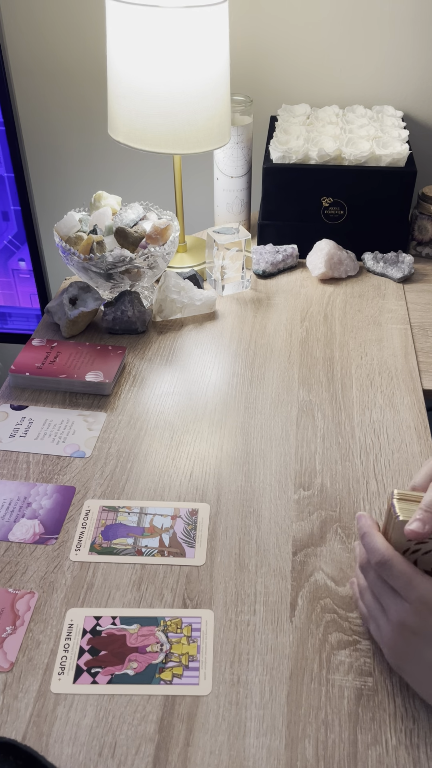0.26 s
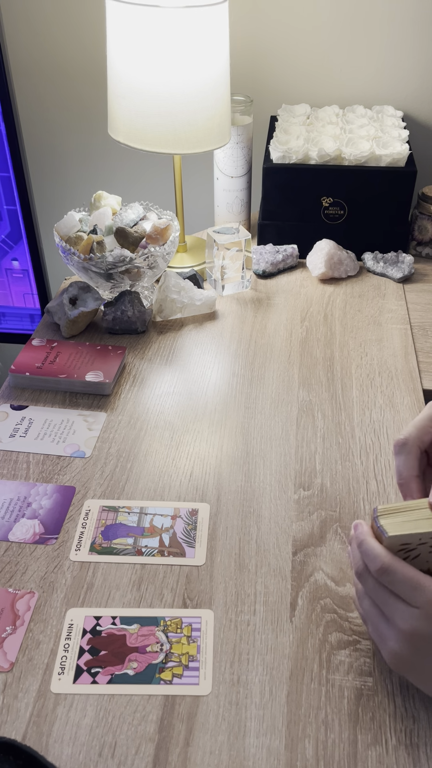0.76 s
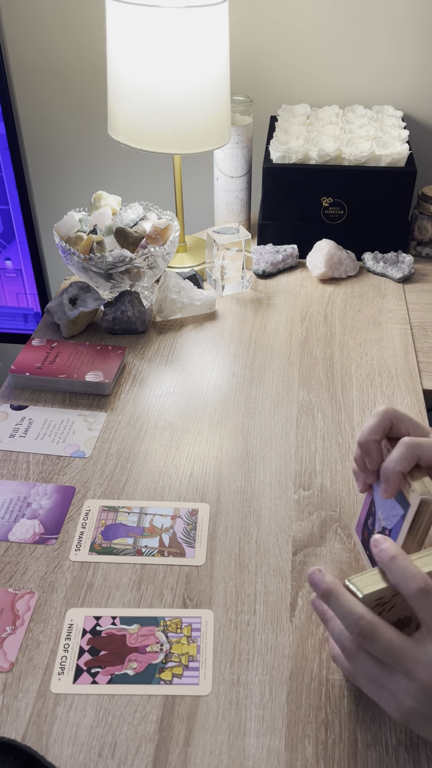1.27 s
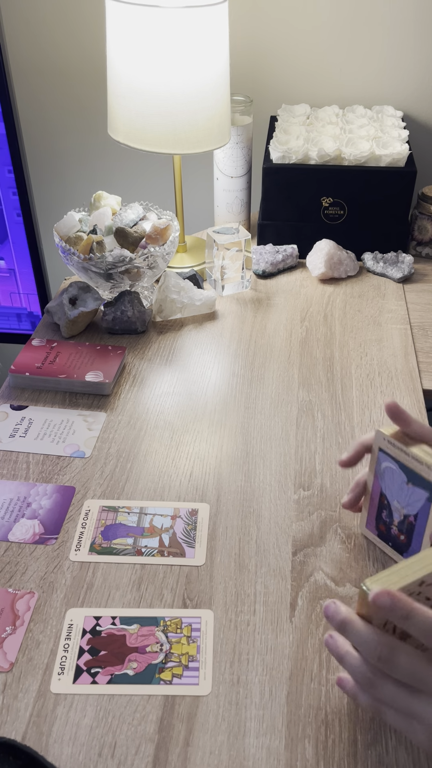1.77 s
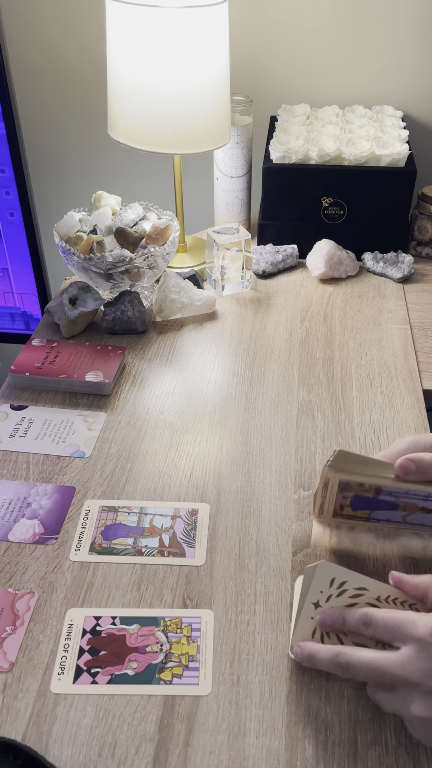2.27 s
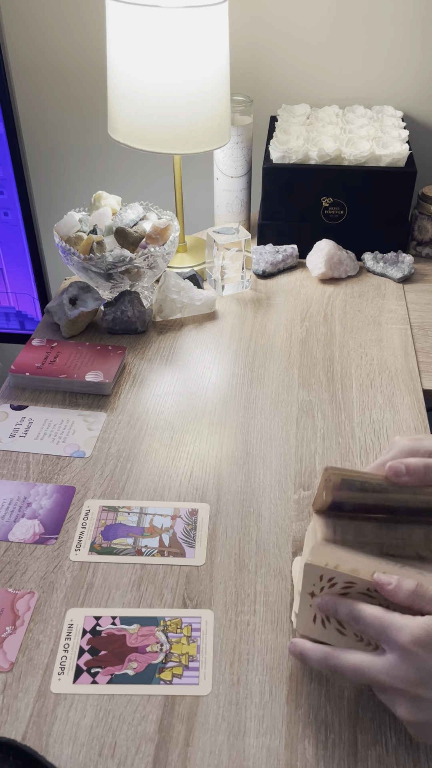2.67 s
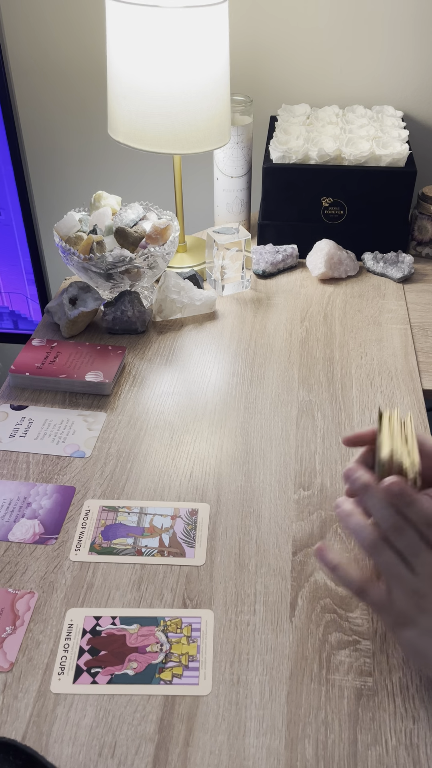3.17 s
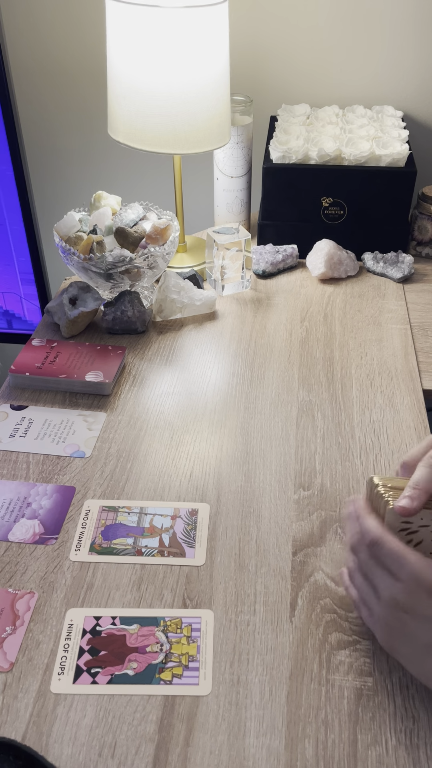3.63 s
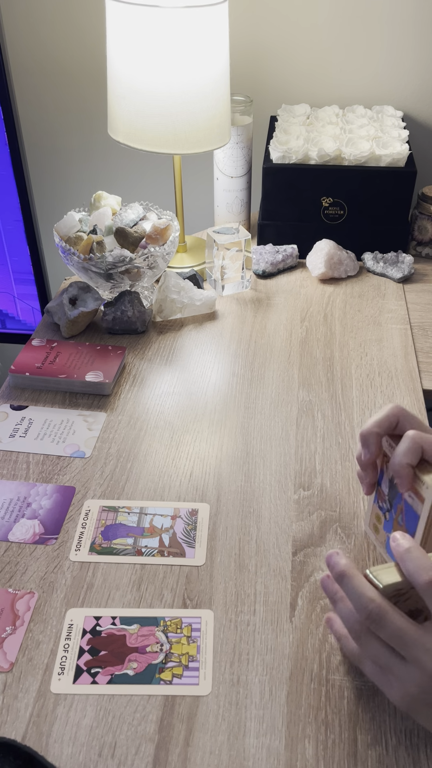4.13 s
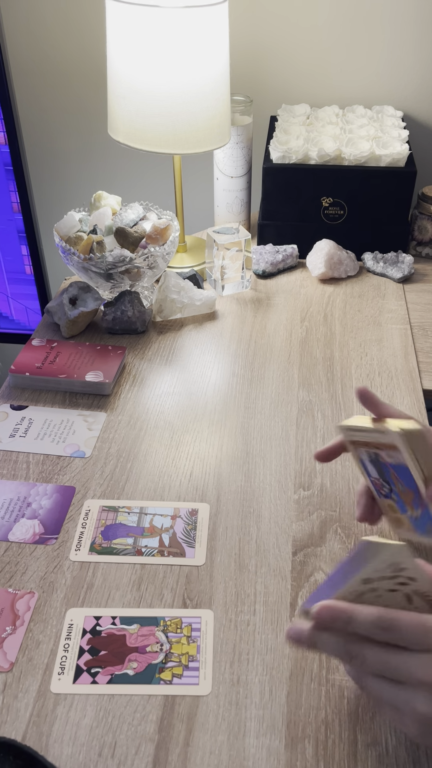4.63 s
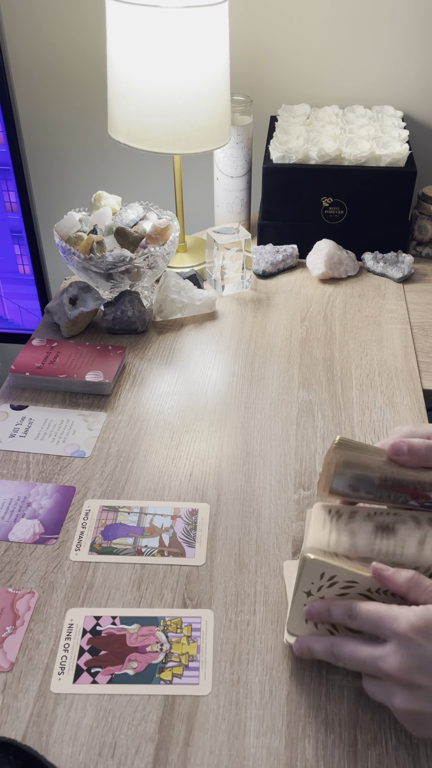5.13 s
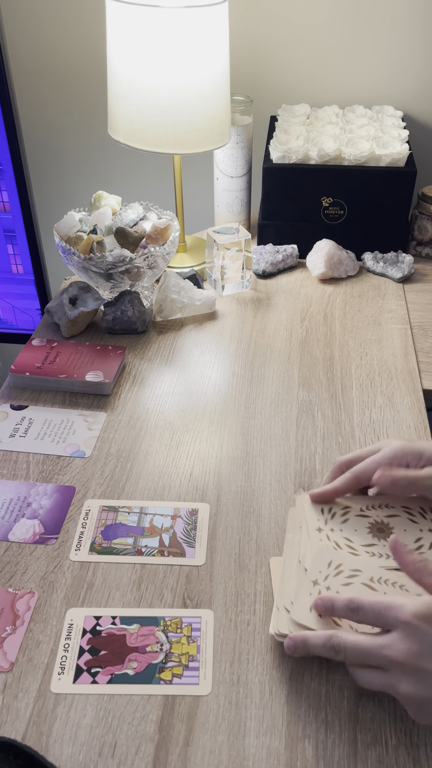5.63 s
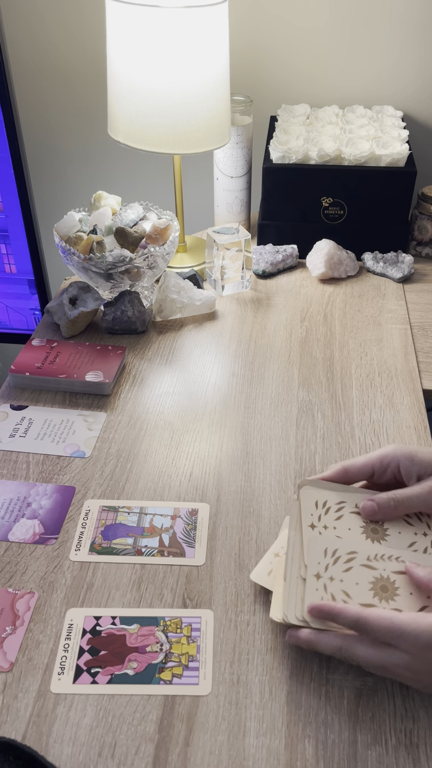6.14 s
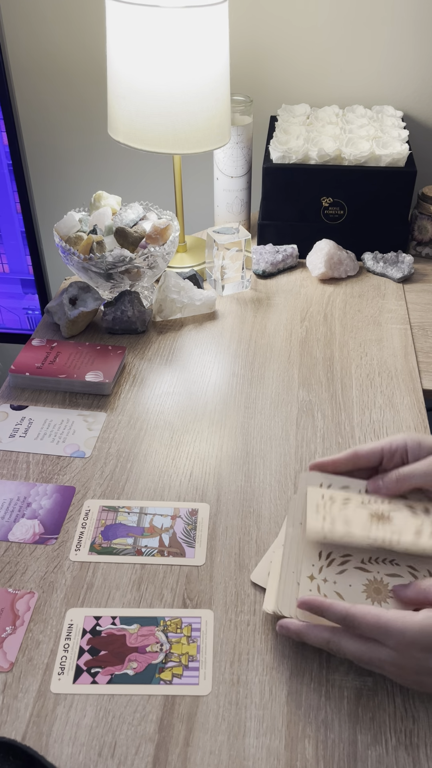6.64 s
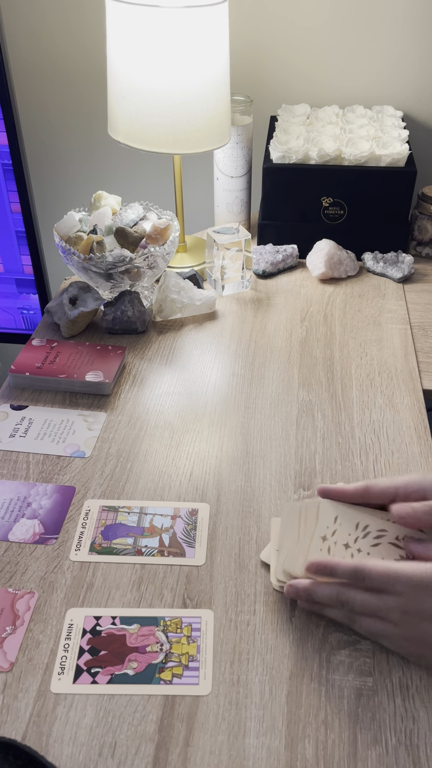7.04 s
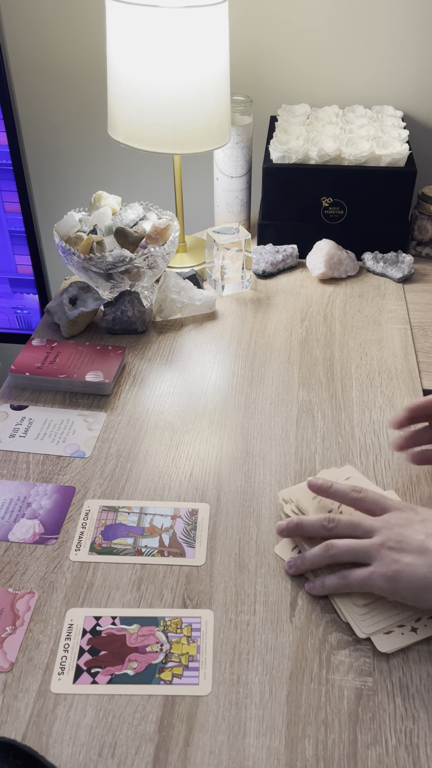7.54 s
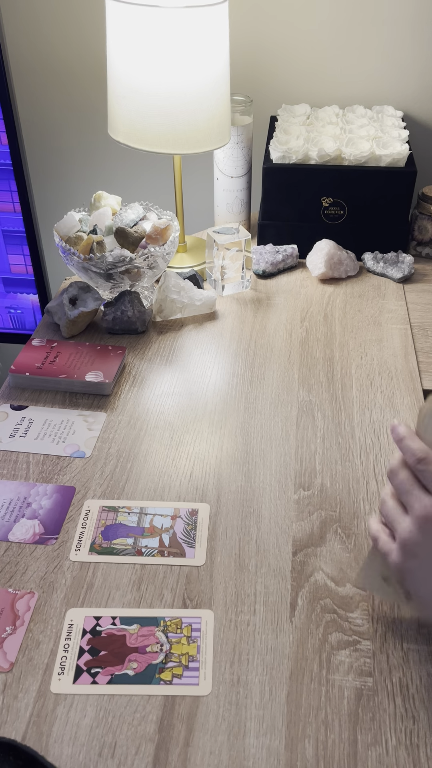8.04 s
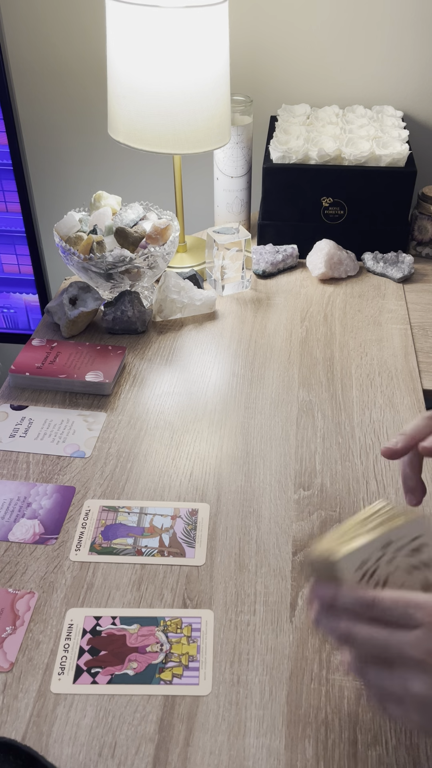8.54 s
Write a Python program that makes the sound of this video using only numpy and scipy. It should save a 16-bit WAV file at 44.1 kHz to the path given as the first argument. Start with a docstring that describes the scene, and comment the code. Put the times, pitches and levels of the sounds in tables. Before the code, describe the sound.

Close, crisp card shuffling in a small quiet room, with loud packet knocks, two riffles, papery slides and a final clump over steady hum.

```python
"""Two hands shuffle large stiff cards on a wooden table in a small quiet room: hum and rumble throughout,
hard knocks at once, light ones from 1.1 s, a loud one at 1.8 s, a run of ticks from 2.2 s, mixed knocks
from 3.2 s up to two loud ones at 4.4 s, more ticks to 5.5 s, sparse slides and ticks, a loud clump at 8.2 s.
Knocks, pats and ticks are coloured noise bursts that ring table and glass; slides are grainy filtered
noise; the room is decaying diffuse noise; the hum is a sum of sines, the rumble shaped noise."""
import sys
import numpy as np
from scipy import signal
from scipy.fft import rfft, irfft, next_fast_len
from scipy.io import wavfile
from scipy.ndimage import uniform_filter1d, minimum_filter1d

SR = 44100
rng = np.random.default_rng(int(sys.argv[2]) if len(sys.argv) > 2 else 0)


def wav_out(sig):
    """Save sig, one row per channel (or a flat mono array), as 16-bit PCM at SR to the path in sys.argv[1]."""
    wavfile.write(sys.argv[1], SR, np.round(np.clip(np.atleast_2d(sig).T, -1, 1) * 32767).astype(np.int16))


def natural_amplitude(level_db):
    """Convert a level in decibels to a linear amplitude factor, elementwise."""
    exponent = np.asarray(level_db, float) / 20
    return 10 ** exponent


N = 388080

# packets landing on the table or each other: (t/s, level/dB, low-end thud/dB, pitch/Hz, length/ms)
PACKET_KNOCKS = [(0.113, -7.5, 5.5, 1480, 9.1), (0.131, -11, -4.5, 5420, 7.8),
                 (0.202, -1.5, -1.5, 2850, 5.5), (1.1048, -19, 4, 2300, 6.6), (1.125, -29, 2, 2500, 3.4),
                 (1.1923, -28.5, 1, 1940, 8.1), (1.2109, -26.5, -0.5, 3000, 4.3),
                 (1.307, -25, 7.5, 4600, 10), (1.4782, -30.5, 7, 1900, 14), (1.506, -15, -4.5, 2260, 6.6),
                 (1.5152, -18.5, 8.5, 1570, 4.8), (1.772, -13, 6.5, 950, 5), (1.8082, -3, -0.5, 3970, 5.2),
                 (2.217, -19, 5.5, 1760, 5.4), (2.3229, -27.5, 3.5, 1900, 22),
                 (2.3395, -22, -36.5, 1970, 4.4), (2.458, -31, 2.5, 2000, 7.8),
                 (3.212, -17.5, 2.5, 3960, 6.5), (3.2222, -10, 3, 890, 8.5), (3.233, -13, -11, 2500, 6.7),
                 (3.2405, -15, -0.5, 5030, 5.1), (3.252, -21, -0.5, 2400, 13),
                 (3.319, -16.5, -9, 3000, 6.4), (3.333, -22, 0, 3200, 10), (3.5237, -10, -6.5, 2290, 4),
                 (3.663, -28.5, 5, 1900, 7.2), (3.674, -20, -19, 1860, 4.5), (3.682, -36, 13, 2000, 5.9),
                 (3.8953, -24, -3, 1300, 6.5), (3.972, -30, -1, 2100, 12), (4.077, -22, -1.5, 1800, 12.3),
                 (4.091, -20.5, -3.5, 1600, 8.3), (4.3829, -4, 1, 2030, 2.4),
                 (4.3982, -0.5, 3.5, 1330, 5.5), (4.41, -13.5, 12.5, 2180, 7.7),
                 (4.986, -17.5, 2, 1940, 10), (5.6666, -28.5, 3, 1130, 3.4), (6.0138, -29, -0.5, 2030, 7.3),
                 (6.508, -28, -32.5, 1550, 6.1), (6.641, -16, -16.5, 2110, 1.7),
                 (8.212, -13.5, -9, 2930, 4), (8.2355, -9.5, -9, 5040, 2.4), (8.2465, -4, -2, 4160, 3.5),
                 (8.2572, -4, -3.5, 2750, 6.5), (8.263, -3, -7.5, 1160, 4.5), (8.435, -35, 14.5, 1080, 14),
                 (8.778, -25, 21, 960, 3.2)]
# packets landing cushioned by the fingers: (t/s, level/dB, low-end thud/dB, pitch/Hz, length/ms)
CUSHIONED_PATS = [(0.0928, -11, -2.5, 1460, 5.9), (0.1012, -11, -5, 2260, 7.5),
                  (1.2696, -9.5, 4.5, 1510, 7.6), (1.6, -33, 10, 1024, 11), (3.7498, -33.5, -11, 1840, 5.1),
                  (3.811, -41, 3, 1100, 10), (3.9545, -34.5, 9, 1903, 6.8), (3.966, -25, 4, 2110, 9),
                  (3.998, -32.5, 17, 2510, 10), (4.063, -24.5, 1.5, 1890, 6.4), (4.369, -32, -6.5, 900, 14),
                  (7.693, -32, 6, 1187, 7.3), (7.87, -43, 12, 1310, 6.5), (8.1253, -25.5, 9.5, 1165, 7),
                  (8.144, -30, 5.5, 2400, 5.1), (8.1825, -14, 2, 2700, 12.4), (8.2002, -11, -5, 3000, 2.2),
                  (8.397, -28, 5, 1165, 27)]
# single card edges flicking free: (t/s, level/dB, treble edge/dB, pitch/Hz, length/ms)
EDGE_TICKS = [(0.143, -8.5, -6.5, 4900, 4.3), (2.2266, -24.5, 17.5, 1720, 2), (2.418, -31, -28, 1810, 1.9),
              (2.467, -31, 1, 2000, 3.6), (2.5035, -28.5, 10, 2200, 3.5), (2.5197, -32.5, -26, 1410, 5.5),
              (2.548, -31, 6, 5100, 8), (2.5673, -25, 8.5, 2070, 2.5), (2.603, -31.5, 14, 1950, 5),
              (2.62, -22.5, 15, 6100, 1.1), (2.649, -30, 11, 7340, 3.1), (2.668, -29, -4, 5600, 2.5),
              (2.6882, -26, -4, 2070, 1.7), (2.715, -27, 2, 1830, 5.2), (2.7363, -22.5, 10.5, 1930, 2.5),
              (2.763, -38.5, 18.5, 1910, 4.8), (2.928, -29.5, -31, 2060, 3), (3.529, -16, -4, 2080, 4),
              (4.052, -35.5, -2.5, 4500, 1.6), (4.195, -22, -5.5, 2800, 8.8), (4.8471, -23.5, 8, 2310, 3.2),
              (4.8507, -15.5, -9, 2540, 4.6), (4.859, -22, -21, 1320, 4.7), (4.935, -29, 13, 4500, 0.92),
              (4.978, -23, 11, 2140, 5.7), (5.0059, -19.5, 10, 1280, 3.9), (5.056, -29.5, 4.5, 2030, 1.4),
              (5.0865, -23.5, -13.5, 1540, 5.4), (5.128, -39, 16, 1590, 5.8), (5.141, -27.5, 4, 2200, 1.2),
              (5.163, -26.5, 6.5, 2010, 8), (5.186, -43.5, 3.5, 4940, 4.8), (5.2234, -25.5, 2, 2300, 6.3),
              (5.238, -38, -1, 4500, 8.8), (5.25, -35.5, 2.5, 5000, 6.5), (5.274, -33.5, 12.5, 2190, 6),
              (5.3104, -28.5, 5.5, 5340, 10), (5.336, -49.5, 11, 5500, 2.6), (5.355, -32, 13, 4600, 10),
              (5.375, -33.5, 15, 6040, 6.3), (5.396, -30.5, 4.5, 1540, 8), (5.4306, -31, 15.5, 5050, 2.8),
              (5.476, -35.5, -9, 4000, 5.9), (5.6364, -38, 20.5, 2050, 2.1), (5.652, -32, -2, 1060, 5.7),
              (5.989, -30, -2, 3900, 1.5), (6.002, -39, 2.5, 1930, 1.9), (6.393, -47, 24, 6200, 2.2),
              (6.431, -25, 6, 1610, 2.3), (6.455, -27.5, -9, 2350, 4.2), (6.502, -36.5, 18.5, 2000, 2.6),
              (6.52, -38, 9.5, 1690, 3.6), (6.536, -34, -16, 1700, 1.7), (6.571, -36, 5, 1470, 7.4),
              (6.617, -33, -22, 1260, 11), (6.8316, -25.5, 20.5, 3300, 2.3), (6.911, -37.5, 12, 2500, 5.1),
              (7.279, -42, -5, 2240, 1.8), (8.772, -29, 3.5, 2760, 3.3)]
# spectrum of a stiff card snapping: (f/Hz, density/dB)
SNAP_SPECTRUM = [(60, -31), (150, -12), (330, 5.5), (1000, 0.5), (2800, -1), (6000, -6.5), (9000, -11),
                 (16000, -28)]
# resonances of a packet: (f/Hz, level/dB, width/octaves)
PACKET_RESONANCES = [(580, 3.5, 0.11), (1120, 3.5, 0.07), (1620, 2.5, 0.06), (2050, 3.5, 0.06),
                     (2600, 4, 0.06), (5100, 3, .12)]
# a single card, low and high rings with a hollow between: (f/Hz, level/dB, width/octaves)
CARD_RESONANCES = [(1950, 4, .14), (3350, -6, .16), (5600, 4, .17)]
# modes of the table top: (f/Hz, level/dB, t60/s)
TABLE_MODES = [(131.7, 1.5, 0.33), (237, -5, 0.15), (357, 8, 0.06), (650, -7, 0.044)]
# glassware ringing along faintly: (f/Hz, level/dB, t60/s)
GLASS_MODES = [(2530, -80, .6), (2834, -83, 1.1), (2851, -85, .9)]
# strokes of cards sliding over cards: (t of full pressure/s, hold/s, level/dB, treble brightness/dB)
SLIDE_STROKES = [(0.222, 0.19, -50.5, -15), (1.07, 0.0054, -54.5, 12.5), (1.431, 0.21, -47, -16.5),
                 (1.989, 0.096, -53.5, -1), (2.182, 0.0092, -59, 6), (2.456, 0.34, -43, 0),
                 (2.859, 0.52, -46.5, 2), (3.308, 0.043, -32, -18), (3.502, 0.24, -42.5, -23.5),
                 (3.982, 0.14, -37, -22), (4.638, 0.107, -55.5, -1.5), (5.068, 0.006, -41.5, 5),
                 (5.239, 0.3, -46.5, -3.5), (5.772, 0.08, -47, -3.5), (5.822, 0.014, -44, 13),
                 (6.01, 0.034, -36.5, 3), (6.289, 0.092, -45.5, 0), (6.482, 0.027, -47, -2.5),
                 (6.619, 0.0099, -45, 5.5), (6.839, 0.03, -41.5, 1), (7.031, 0.043, -47, 6),
                 (7.185, 0.0071, -46, 1.5), (7.333, 0.0072, -44, 4.5), (7.582, 0.065, -48.5, 5),
                 (7.673, 0.013, -39, -6.5), (7.803, 0.12, -49, -2.5), (7.987, 0.056, -54.5, 6),
                 (8.176, 0.29, -43, -14.5), (8.784, 0.017, -51, -13.5)]
# friction spectrum: (f/Hz, density/dB)
RUB_SPECTRUM = [(200, -2.5), (600, -5), (1200, -0.5), (2000, 1), (3200, -2.5), (6000, -1.5), (9000, 1),
                (12000, -9.5), (16000, -9)]
# reflections: (f/Hz, t60/s, level/dB)
ROOM_BANDS = [(120, 0.29, 10), (323, 0.35, 5), (870, 0.33, 4.5), (2370, 0.3, 5.5), (4500, 0.38, 6),
              (6900, 0.24, 3.5), (11700, 0.037, 12.5)]
# mains hum: (f/Hz, level/dB)
HUM_TONES = [(59.5, -59.5), (120.03, -41), (221, -58), (240.06, -56), (720.2, -73.5)]
# rumble of building and air: (f/Hz, relative density/dB)
RUMBLE_SPECTRUM = [(20, -67), (35, -53), (55, -75.5), (120, -65), (200, -69), (280, -77), (400, -76.5),
                   (900, -89.5), (1400, -102), (2800, -109), (16000, -135)]
# diffuse sound: (f/Hz, likeness of the two ports/1)
PORT_LIKENESS = [(200, 1), (400, 0.32), (700, 0.19), (1300, 0.36), (2400, 0.6), (4400, 0.42), (7000, 1),
                 (12000, 0.73)]
# port balance: (f/Hz, left minus right level/dB)
PORT_BALANCE = [(60, -1.0), (130, -2.0), (290, -5.0), (640, -5.5), (1410, -1.0), (3100, 0.0), (6820, -0.5),
                (15000, 0.0)]
# port phase: (f/Hz, lead of left over right/rad)
PORT_PHASE = [(0, 0), (340, -.05), (860, .7), (1460, -.3), (2150, .2), (3010, 1.0), (3960, .2), (4910, .5),
              (6370, 1.6), (9820, 3.1), (13700, 3.2), (14800, 3.9), (16400, 4.4)]

THUD_ABOVE_HZ, THUD_BELOW_HZ, EDGE_ABOVE_HZ = 248, 680, 5520
KNOCK_EDGE_DB, EDGE_DB_PER_OCTAVE = -8.5, 4  # treble at 2 kHz pitch; higher knocks are crisper
EDGE_DB_PER_THUD_DB = -0.42  # a flat heavy landing is duller
PAT_EDGE_DB = -26.5  # skin swallows the treble
PACKET_RING_DB, RING_OCTAVES = 5.5, 0.33  # ring of the bent packet around its pitch
TICK_THUD_DB, TICK_RING_DB = -4.5, 7.5  # one card is light and rings clearly
GRIP_DB, GRIP_SHARE, GRIP_OCTAVES = 3, .6, .06  # spread of colour, resonance depth and resonance pitch
TABLE_DB = -20
CATCHES_PER_S, CATCH_SPREAD_DB = 400, 4
PRESS_DB_PER_S, LIFT_DB_PER_S = 251.5, 221
REST_DB, REST_BRIGHT_DB = -64, -11  # hands at rest still rustle faintly
ROOM_DB, TICK_ROOM_DB = -9.5, -13  # a flick between the palms reaches the walls less
TURN_S = .043  # period of the turn between two diffuse tails/s
LOW_HZ, TOP_HZ, CEILING = 44, 16000, 1


def packets():
    """Knocks and pats as contacts: t/s, level/dB, thud/dB, edge/dB, ring/dB, pitch/Hz, length/ms."""
    contacts = []
    for s, db, thud_db, pitch_hz, ms in PACKET_KNOCKS:
        edge_db = KNOCK_EDGE_DB + EDGE_DB_PER_OCTAVE * np.log2(pitch_hz / 2000) + EDGE_DB_PER_THUD_DB * thud_db
        contacts.append((s, db, thud_db, edge_db, PACKET_RING_DB, pitch_hz, ms))
    for s, db, thud_db, pitch_hz, ms in CUSHIONED_PATS:
        contacts.append((s, db, thud_db, PAT_EDGE_DB, PACKET_RING_DB, pitch_hz, ms))
    return contacts


def flicks():
    """Single light cards as contacts of the same form."""
    return [(s, db, TICK_THUD_DB, edge_db, TICK_RING_DB, pitch_hz, ms)
            for s, db, edge_db, pitch_hz, ms in EDGE_TICKS]


def impacts(contacts, body):
    """Each contact is a noise burst of some ms, coloured by the body; its blow rings the table."""
    out, blows = np.zeros(N + 2048), np.zeros(N + 2048)
    t = np.arange(2048) / SR
    chance = rng.standard_normal((len(contacts), 3, 2048))
    for contact, (noise, clumps, grip) in zip(contacts, chance):
        s, db, thud_db, edge_db, ring_db, pitch_hz, ms = contact
        shape = clump_shape(t, ms)
        burst = shape * noise * natural_amplitude(16 * uniform_filter1d(clumps, 32))
        burst *= natural_amplitude(db) * np.sqrt(shape @ shape / (burst @ burst))
        colour_db = contact_colour_db(thud_db, edge_db, ring_db, pitch_hz, body, grip)
        # even out the chance ripple of the short noise burst
        ripple = uniform_filter1d(abs(rfft(burst)) ** 2, size=20) / (burst @ burst)
        colour_db -= 10 * np.log10(ripple + .05)
        at = round(s * SR)
        out[at:at + 2048] += signal.fftconvolve(burst, causal_response(colour_db)[:1024])[:2048]
        blows[at:at + 2048] += natural_amplitude(db + thud_db) * shape / shape.max() * np.exp(-t / 0.00031)
    table = natural_amplitude(TABLE_DB) / 20 * signal.oaconvolve(blows, ring(TABLE_MODES))
    glass = signal.oaconvolve(out, ring(GLASS_MODES))
    return (out + table[:len(out)] + glass[:len(out)])[:N]


def clump_shape(t, ms):
    """Envelope: the first edge lands at once; long clumps then gather before dying."""
    u = t * 1000 / max(ms, .5)
    gather = 1 - min(ms / 14, .7) * np.exp(-(u / .45) ** 2)
    return gather * np.exp(-(u / 1.2) ** 2)


def contact_colour_db(thud_db, edge_db, ring_db, pitch_hz, body, grip):
    """Snap spectrum plus thud, edge, ring and body; the grip frees, damps and bends each resonance."""
    hz = np.fft.rfftfreq(2048, 1 / SR)
    thud = above(hz, THUD_ABOVE_HZ) * (1 - above(hz, THUD_BELOW_HZ))
    colour_db = read(SNAP_SPECTRUM, hz) + thud_db * thud + treble(hz, edge_db)
    colour_db += ring_db * np.exp(-.5 * (np.log2((hz + 1) / pitch_hz) / RING_OCTAVES) ** 2)
    for (f, lift_db, octaves), free, bend in zip(body, grip[::-2], grip[-2::-2]):
        offset = np.log2((hz + 1) / f) - GRIP_OCTAVES * bend
        colour_db += lift_db * (1 + GRIP_SHARE * free) * np.exp(-.5 * (offset / octaves) ** 2)
    colour_db += GRIP_DB * np.interp(np.log2(hz + 1), np.linspace(8, 14, num=25), grip[:25])
    return colour_db


def causal_response(colour_db):
    """Minimum-phase impulse response, so that nothing sounds before the blow."""
    log_gain = np.log(natural_amplitude(np.r_[colour_db, colour_db[-2:0:-1]]))
    return np.fft.ifft(np.exp(np.conj(signal.hilbert(log_gain)))).real


def treble(hz, change_db):
    """Brightness in dB: none in the body; the duller a contact, the lower its treble starts to fall."""
    corner_hz = EDGE_ABOVE_HZ * 2 ** (np.minimum(change_db, 0) / 45)
    return change_db * above(hz, corner_hz, order=12) * np.sqrt(hz / 9000)


def ring(modes):
    """Impulse response of dying modes."""
    t = np.arange(SR) / SR
    return sum(natural_amplitude(db - 60 * t / t60) * np.sin(2 * np.pi * f * t) for f, db, t60 in modes)


def slides():
    """Friction of coated paper: patchy hiss made grainy by fibres and edges catching."""
    catch_gain = natural_amplitude(CATCH_SPREAD_DB * np.minimum(rng.exponential(1, N), 4))
    catches = catch_gain * (rng.random(N) < CATCHES_PER_S / SR)
    grain = .6 + 6 * signal.lfilter([.03], [1, -.97], catches)
    rub = grain * rng.standard_normal(N)
    hz, t, z = signal.stft(rub / rub.std(), SR, nperseg=256, noverlap=192)
    patches = uniform_filter1d(uniform_filter1d(rng.standard_normal(z.T.shape), 14, 0), 10, 1).T
    level_db, bright_db = pressure(t)
    colour_db = read(RUB_SPECTRUM, hz)[:, None] + treble(hz[:, None], bright_db) + 40 * patches
    return signal.istft(z * natural_amplitude(colour_db + level_db), SR, nperseg=256, noverlap=192)[1][:N]


def pressure(t):
    """Level and brightness of the sliding in dB: each stroke builds, holds and lets go."""
    s, hold_s, level_db, bright_db = np.transpose(SLIDE_STROKES)[:, :, None]
    build_db = PRESS_DB_PER_S * np.maximum(s - t, 0)
    release_db = LIFT_DB_PER_S * np.maximum(t - s - hold_s, 0)
    power = natural_amplitude(level_db - build_db - release_db) ** 2
    rest = natural_amplitude(REST_DB) ** 2
    total = power.sum(0) + rest
    return 10 * np.log10(total), ((power * bright_db).sum(0) + rest * REST_BRIGHT_DB) / total


def room(x):
    """Dense reflections that build up and die by band."""
    hz, t = np.fft.rfftfreq(256, 1 / SR), np.arange(400) * 64 / SR
    t60 = read([(f, t60_s) for f, t60_s, _ in ROOM_BANDS], hz)[:, None]
    colour_db = read([(f, db) for f, _, db in ROOM_BANDS], hz)[:, None]
    turn, out = 2 * np.pi * np.arange(N) / SR / TURN_S, 0
    # two diffuse tails take turns, so that no single tail's bands ring on
    for share in (np.cos(turn), np.sin(turn)):
        spectra = diffuse(len(t), hz) * natural_amplitude(colour_db - 60 * t / t60)
        tail = signal.istft(spectra, nperseg=256, noverlap=192)[1]
        tail *= np.clip(np.arange(tail.shape[1]) / SR / .008, 0, 1)  # build-up over 8 ms
        out += signal.oaconvolve(share * x[None], tail / np.linalg.norm(tail[0]), axes=1)[:, :N]
    return out


def hum():
    """Mains-driven tones that waver a little together."""
    t = np.arange(N) / SR
    waver_db = 0.32 * sum(np.sin(2 * np.pi * (f * t + rng.random())) for f in np.geomspace(.3, 6, 8))
    tones = sum(natural_amplitude(db) * np.sqrt(2) * np.sin(2 * np.pi * f * t + k) for k, (f, db) in enumerate(HUM_TONES))
    return natural_amplitude(waver_db) * tones


def rumble():
    """Diffuse low noise with drifting patches."""
    frames, hz = N // 512 + 5, np.fft.rfftfreq(2048, 1 / SR)
    patches = uniform_filter1d(uniform_filter1d(rng.standard_normal((frames, len(hz))), 8, 0), 8, 1).T
    z = diffuse(frames, hz) * natural_amplitude(read(RUMBLE_SPECTRUM, hz)[:, None] + 7.9 * patches + 9.5)
    return signal.istft(z, nperseg=2048, noverlap=1536)[1][:, :N]


def diffuse(frames, hz):
    """Random short-time spectra for two ports, alike by the share given per frequency."""
    a, b, c, d = rng.standard_normal((frames, len(hz), 4)).T
    same = np.clip(read(PORT_LIKENESS, hz), 0, 1)[:, None]
    left = a + 1j * b
    return np.array([left, same * left + np.sqrt(1 - same ** 2) * (c + 1j * d)])


def read(points, hz):
    """Table value at the given frequencies, interpolated over log frequency."""
    f, value = np.transpose(points)
    return np.interp(np.log(hz + 1), np.log(f + 1), value)


def above(hz, corner_hz, order=6):
    """Soft step from 0 to 1 around a corner."""
    return hz ** order / (hz ** order + corner_hz ** order)


def scene():
    """Close cards, their reflections, hum and rumble."""
    cards = impacts(packets(), PACKET_RESONANCES) + slides()
    ticks = impacts(flicks(), CARD_RESONANCES)
    reflections = room(natural_amplitude(ROOM_DB) * cards + natural_amplitude(TICK_ROOM_DB) * ticks)
    return cards + ticks + reflections + hum() + rumble()


def top_cut(x):
    """Nothing passes above the cut-off."""
    return signal.sosfilt(signal.butter(12, 17140, fs=SR, output="sos"), x)


def record(dry):
    """Two ports of one phone differ in level and phase; its band is limited; a quick limiter holds peaks."""
    size = next_fast_len(N + 4096)
    hz = np.fft.rfftfreq(size, 1 / SR)
    half = natural_amplitude(read(PORT_BALANCE, hz) / 2) * np.exp(.5j * read(PORT_PHASE, hz))
    band = above(hz, LOW_HZ) * natural_amplitude(-25 * np.clip((hz - TOP_HZ) / 300, 0, 1))
    ports = irfft(rfft(dry, size) * band * np.array([half, 1 / half]), size)[:, :N]
    allowed = np.minimum(CEILING / (abs(ports).max(0) + 1e-9), 1)
    ports *= uniform_filter1d(minimum_filter1d(allowed, size=129), size=129)
    return top_cut(ports)


dry = scene()
out = record(dry)
wav_out(out)
```